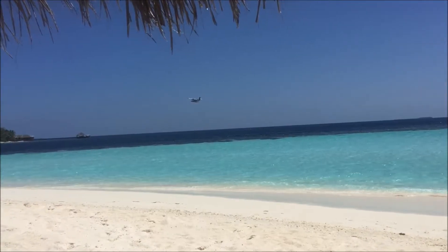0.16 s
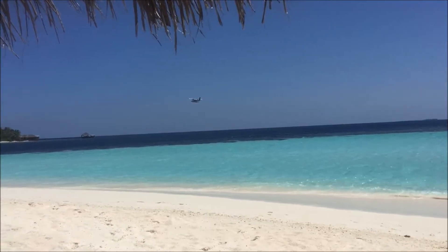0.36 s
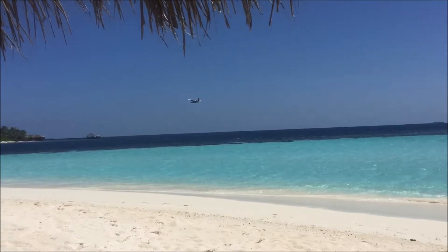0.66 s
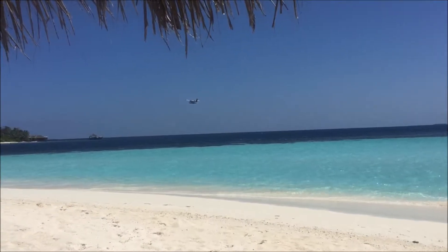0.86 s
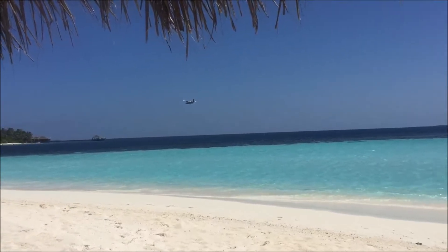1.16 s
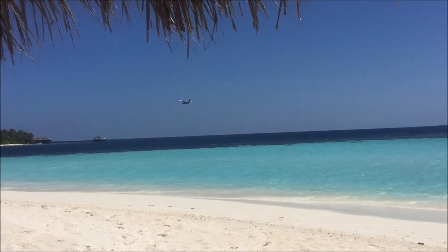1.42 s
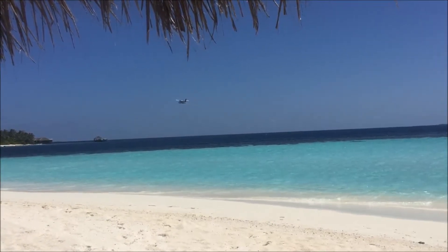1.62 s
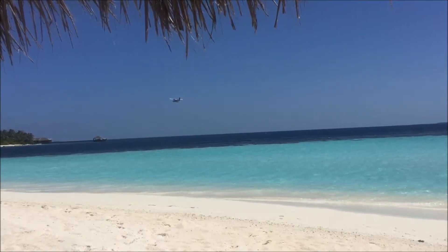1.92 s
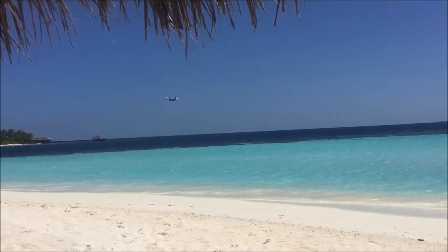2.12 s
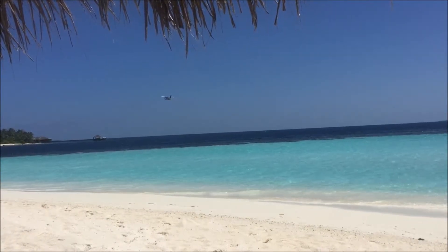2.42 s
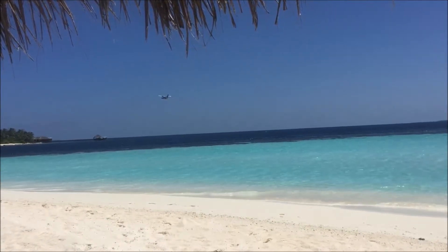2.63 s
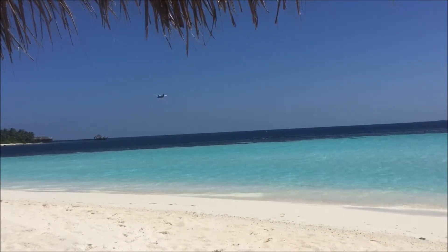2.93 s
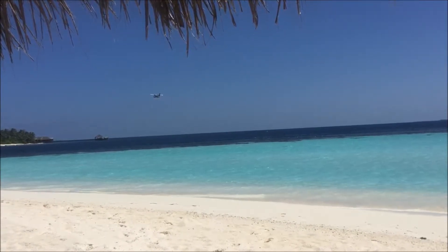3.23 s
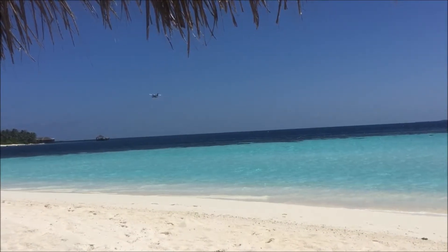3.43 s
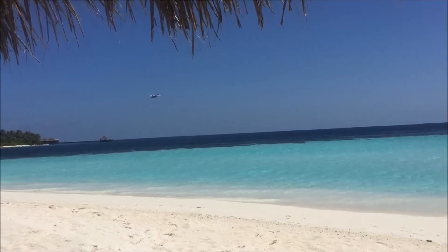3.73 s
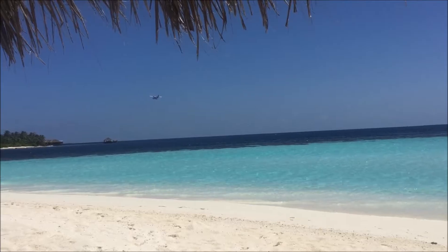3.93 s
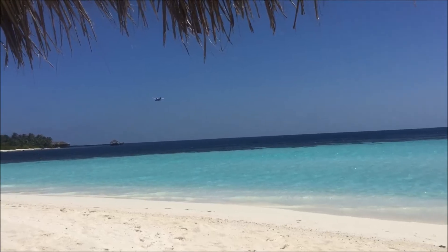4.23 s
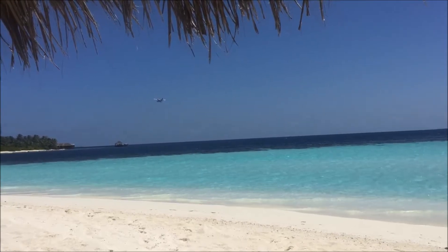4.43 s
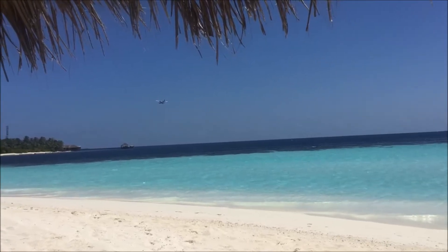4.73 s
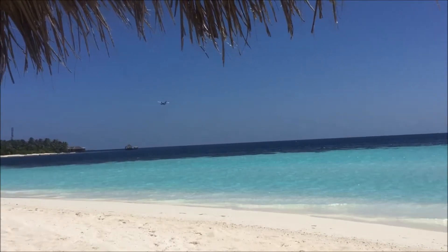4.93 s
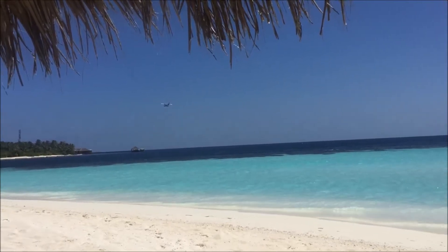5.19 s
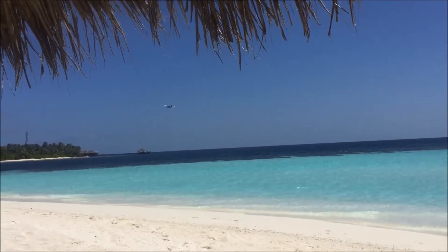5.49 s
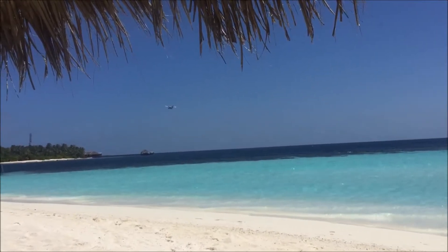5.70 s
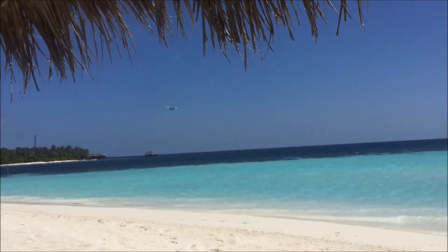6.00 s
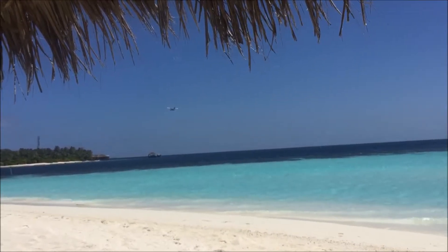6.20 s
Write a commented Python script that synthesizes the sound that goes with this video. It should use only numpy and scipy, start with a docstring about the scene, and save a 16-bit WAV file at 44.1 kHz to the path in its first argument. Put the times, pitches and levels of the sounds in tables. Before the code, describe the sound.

A departing twin-propeller seaplane hums in a low, slowly throbbing drone that fades over a beach with faint small waves and fizzing foam.

```python
"""A twin-turboprop seaplane flies away over a calm lagoon, heard from the beach.
Its two propellers are stacks of pure tones that beat slowly together over a noise roar.
Their drone also returns smeared from sea and shore, as tones that wander in level and phase.
A diesel and other hums sound far off, made of steady and wavering tones.
Small waves wash in and foam fizzes and pops: shaped noise mixed with many tiny ringing bubbles."""
import sys
import numpy as np
from scipy import signal
from scipy.fft import rfft, irfft, next_fast_len
from scipy.io import wavfile
from scipy.ndimage import uniform_filter1d

SR = 44100
rng = np.random.default_rng(int(sys.argv[2]) if len(sys.argv) > 2 else 0)


def pcm_store(signal):
    """Save signal as 16-bit PCM."""
    levels = np.round(np.clip(np.atleast_2d(signal), -1, 1) * 32767)
    wavfile.write(sys.argv[1], SR, levels.astype(np.int16).T)


N = 280035
TIME = np.arange(N) / SR  # seconds

# The plane's level as it draws away: time_s, level_db
FLIGHT = [(0, -27), (2, -28.5), (4, -30), (5, -33.5), (6.35, -39)]
# Blade rate of the faster propeller at the start, and its Doppler sag as the plane turns away
BLADE_HZ, SAG_HZ_PER_S = 96.9, 0.32
# Tones of each propeller, on top of the plane's level: multiple_of_blade_rate, level_db
FAST_PROP = [(1, 1), (2, -29)]
SLOW_PROP = [(1, -1.5), (2, -12), (3, -27.5), (4, -40)]
# Added level of the slower propeller, which sets how deep the beat is: time_s, level_db
SLOW_LEVEL = [(0, 1.5), (1.6, -1), (2.6, -0.5), (3.6, -4), (4.6, -3), (6.35, -3)]
# How far the slower propeller lags; the main tones oppose at every half blade: time_s, lag_blades
LAG = [(0, -.1), (.3, .15), (.72, .5), (.88, .8), (1.3, 1.15), (1.62, 1.5), (1.86, 1.7), (2.0, 1.93),
       (2.35, 2.28), (2.66, 2.5), (2.87, 2.8), (3.25, 3.05), (3.6, 3.5), (3.8, 3.67), (3.92, 3.92),
       (4.27, 4.1), (4.45, 4.45), (5.3, 5.15), (5.6, 5.5), (6.35, 6.3)]
# Broad roar of exhaust and wake: pitch_hz, relative_level_db_per_hz
ROAR = [(125, 3.5), (165, 7.5), (260, -0.5), (370, -3), (620, -11.5), (850, -20), (1300, -23), (2200, -28)]

# Scattered drone, before its level changes over time:
# multiple_of_blade_rate, level_db, doppler_ratio (pitch factor of the paths that carry it)
SCATTER = [(1, -38.5, 1.085), (2, -41, 1.055), (2, -53, 1.14), (3, -51.5, 1.075), (4, -57.5, 1.11),
           (5, -60, 1.11), (6, -62.5, 1.1)]
# Quick, irregular changes in level of the scattered drone:
# time_s, second_harmonic_db, third_harmonic_db
SCATTER_CHANGES = [(0, 1, -1), (.13, -1, 5), (.38, -8, -2.5), (1.12, 0, -2.5), (1.55, 2.5, 1), (2.1, -3, 1),
                   (2.45, -6, 0.5), (2.65, 2.5, 1.5), (3.07, 2.5, 5), (3.33, 3, 2), (3.6, -3, 1),
                   (3.9, 7, 1), (4.07, -5.5, -2), (4.28, 3, -.5), (4.55, -1.5, -1), (4.73, 6.5, -0.5),
                   (4.85, -2, -4), (5.1, 1.5, -6), (5.42, -5, 4.5), (5.7, 6.5, 2), (5.85, -1, -1.5),
                   (6.1, 0.5, 4.5), (6.35, 5, -3)]

# Tones of a distant diesel: multiple_of_shaft_rate, level_db
DIESEL = [(2, -70), (3, -60.5), (4, -41), (5, -49.5), (6, -52), (8, -50.5), (10, -56)]
# Wavering background hums: pitch_hz, width_hz, level_db
HUMS = [(63.77, 2.7, -50), (115.5, 4.9, -43.5), (159.4, 4, -55), (254.6, 10.7, -59)]

# Small waves that break on the shore:
# crest_s, rise_s, dull_rush_db, wash_db, spray_db, wash_fall_db_per_s
WAVES = [(.04, 0.75, -40, -42, -72, 11), (.37, 0.16, -48.5, -46, -78, 4), (.99, 0.58, -56, -47, -68.5, 8.5),
         (1.3, 0.6, -43.5, -53.5, -84, 4), (1.9, 0.63, -49, -49.5, -68, 12),
         (2.74, 0.42, -46.5, -48.5, -59.5, 8), (4.08, 0.63, -48.5, -48, -67, 3),
         (5.39, 0.49, -46.5, -47, -58, 20), (5.8, .25, -54, -59, -66, 24)]
RUSH_FALL_DB_PER_S, SPRAY_FALL_DB_PER_S = 17.5, 11.5
RUSH_REST_DB, WASH_REST_DB = -52.5, -50.5  # the water between waves
# Sheets of foam that run up the sand and soak in: fullest_s, rise_s, level_db, fall_db_per_s
FOAM = [(.05, 0.34, -57.5, 4.5), (1.02, 0.34, -51, 35), (1.68, 0.17, -60, 46), (2.68, 0.37, -59, 7),
        (4.2, 1.2, -60, 8.5), (5.42, 0.53, -65, 6.5)]
# Tone colours of the dull rush, the wash, the breaking spray and the foam:
# pitch_hz, relative_level_db_per_hz
RUSH = [(400, -11), (620, -2), (830, -2.5), (1100, 0.5), (1600, -2), (1950, -4), (2800, -23)]
WASH = [(900, -33), (1400, -7), (1800, -1.5), (2300, 1), (2800, 0.5), (3150, -7.5), (3900, -9.5),
        (4400, -19), (4850, -30), (5600, -30), (7500, -53)]
SPRAY = [(2800, -4.5), (4000, 7), (4800, -5.5), (5700, -3), (6500, -22), (8000, -28)]
FIZZ = [(3500, -31), (4900, -12.5), (5700, 1), (6800, 1), (7350, -4), (8000, -2), (8750, 3), (9700, 3.5),
        (10400, -7), (10900, -2), (11700, -2.5), (12900, -23), (15500, -29)]

# Single bubbles and drops, and one slap of a wave near 1 s: start_s, peak_db, pitch_hz, width_hz, ring_s (time
# to fall 60 dB)
POPS = [(0.078, -36, 1390, 120, .035), (0.102, -35, 1650, 120, 0.031), (0.131, -32, 1100, 110, .03),
        (.27, -42, 6400, 2000, .012), (.338, -46, 6850, 700, .025), (.536, -47, 11100, 1100, .02),
        (.751, -44, 6300, 900, .025), (0.864, -37, 9500, 1200, 0.01), (0.971, -45, 4270, 900, 0.044),
        (.984, -39, 7500, 2000, .012), (.997, -30, 950, 550, .018), (1.031, -41, 5940, 700, .015),
        (1.114, -39, 9500, 1500, 0.0079), (1.324, -48, 6500, 3000, .012), (1.377, -40, 8900, 1800, 0.022),
        (2.603, -47, 6460, 700, 0.04), (2.806, -41, 11600, 700, 0.02), (3.143, -49, 7600, 1200, 0.033),
        (3.401, -43, 6500, 700, 0.023), (3.526, -29.5, 2252, 110, 0.031), (3.831, -44, 8700, 2200, .015),
        (4.275, -46, 6900, 1200, 0.023), (4.38, -46, 10200, 1400, .008), (4.549, -40, 8900, 3000, 0.006),
        (4.552, -35.5, 7000, 4500, 0.004)]

# Tone colour of the open sea's low murmur: pitch_hz, relative_level_db_per_hz
AIR = [(30, -23), (42, -1), (55, 6), (130, 0), (180, 6.5), (240, 0.5), (350, -10), (480, -11.5), (650, -9),
       (850, -13.5), (2000, -40)]

HISS_DB = -74  # self-noise of the microphone, before the top is cut
TOP_HZ = 15700  # the treble is cut above this


def undb(db):
    """Turn decibels into a gain."""
    return 10 ** (np.asarray(db) / 20)


def unit(x):
    """Scale a sound to an average strength (rms) of 1."""
    return x / np.sqrt(np.mean(np.abs(x) ** 2))


def curves(table):
    """Join the points of each table column by straight lines in time."""
    s, *columns = np.transpose(table)
    return [np.interp(TIME, s, column) for column in columns]


def noise():
    """Plain white noise, equally strong at every pitch."""
    return rng.standard_normal(N)


def colour(x, spectrum):
    """Shape a sound by a table of pitches and levels, falling steeply beyond its ends; rms 1."""
    size = next_fast_len(N)
    hz, db = np.transpose(spectrum)
    f = np.maximum(np.arange(size // 2 + 1) * SR / size, 1)
    skirts = np.minimum(f / hz[0], 1) ** 2 * np.minimum(hz[-1] / f, 1) ** 2
    gain = skirts * undb(np.interp(np.log(f), np.log(hz), db))
    return unit(irfft(rfft(x, size) * gain, size)[:N])


def walk(rate):
    """Smooth random wandering with spread 1, about `rate` turns a second."""
    points_per_s = 500
    f = np.fft.rfftfreq(4096, 1 / points_per_s)
    rough = rng.standard_normal(2 * len(f) - 2)
    slow = irfft(rfft(rough) * np.exp(-(f / rate) ** 2))
    return unit(np.interp(TIME, np.arange(len(slow)) / points_per_s, slow))


def turns(hz):
    """Add up a changing rate into a running phase, in radians."""
    return 2 * np.pi * np.cumsum(hz) / SR


def tones(phase, orders, flutter_db, flutter_rate):
    """Harmonics of a rotor; turbulent air makes each flutter in level."""
    total = 0
    for multiple, db in orders:
        gain = undb(db + flutter_db * walk(flutter_rate))
        total = total + gain * np.sin(round(multiple) * phase)
    return np.sqrt(2) * total  # a sine then has the rms level given by its table


def propellers(phase, level_db):
    """The slower propeller slips one blade behind the other in every beat; exhaust roars beneath."""
    lag_blades, = curves(LAG)
    slow_db, = curves(SLOW_LEVEL)
    fast = tones(phase, FAST_PROP, flutter_db=0.4, flutter_rate=6)
    slow = tones(phase - 2 * np.pi * lag_blades, SLOW_PROP, flutter_db=0.4, flutter_rate=6)
    roar = undb(-18.5) * colour(noise(), ROAR)
    return undb(level_db) * (fast + undb(slow_db) * slow + roar)


def smeared(phase, width_hz, even_s=0.21):
    """A tone over many shifting paths: it flutters and wanders in phase about an even level."""
    paths = walk(width_hz) + 1j * walk(width_hz)
    recent_power = uniform_filter1d(np.abs(paths) ** 2, int(even_s * SR))
    paths = paths / np.sqrt(recent_power)
    return unit(np.real(paths * np.exp(1j * phase)))


def scattered_drone(phase, spread_hz=4.2, fade_db=0.28, waver_db=2.5):
    """Echoes left the plane earlier, at other angles, so sound higher; upper harmonics spread more."""
    recede_s = TIME - TIME.mean()
    second_db, third_db = curves(SCATTER_CHANGES)
    drawn_db = {1: 0, 2: second_db, 3: third_db}
    total = 0
    for k, db, ratio in SCATTER:
        order = round(k)
        # harmonics above the third waver at random
        change_db = drawn_db[order] if order in drawn_db else waver_db * walk(5.0)
        # the fundamental grows slightly; from the second up, each fades faster than the one below
        fade = fade_db * (k - 1.5) * recede_s
        tone = smeared(order * ratio * phase, k * spread_hz + 3, even_s=k * 0.12)
        total = total + undb(db + change_db - fade) * tone
    return total


def far_engines():
    """A diesel turns at nearly steady speed, with hums that waver around it."""
    shaft_hz = 15.315 * (1 + 0.0013 * walk(0.95))
    diesel = tones(turns(shaft_hz), DIESEL, flutter_db=0.3, flutter_rate=0.98)
    hums = sum(undb(db) * smeared(2 * np.pi * hz * TIME, width / 2) for hz, width, db in HUMS)
    return diesel + hums


def bubbles(per_second, scatter_db, low_hz, high_hz, cycles):
    """Bubbles of unequal size each ring for some cycles and rise a little in pitch."""
    count = int(per_second * N / SR)
    when, pitch, chance, life = rng.random((count, 4)).T[..., None]
    hz = low_hz * (high_hz / low_hz) ** pitch
    size = undb(-scatter_db * np.log(np.maximum(chance, 0.01)))  # a few are much louder
    samples = np.arange(SR // 100)
    done = hz * samples / SR  # cycles rung so far
    age = done / (cycles * (0.5 + life))
    fade = np.exp(-np.log(100) * age)  # 40 dB down at age 1
    rings = size * np.sin(2 * np.pi * done * (1 + 0.02 * age)) * fade
    places = (when * N).astype(int) + samples
    return unit(np.bincount(places.ravel(), rings.ravel(), N)[:N])


def water(spectrum, grains, share):
    """Smooth hiss of countless far bubbles with a share of near, distinct ones."""
    far = np.sqrt(1 - share) * colour(noise(), spectrum)
    near = np.sqrt(share) * colour(grains, spectrum)
    return far + near


def patchy(x, depth_db, bins=7, frames=16):
    """Patches of water splash on their own, so neighbouring pitches swell and sink together."""
    cells = signal.stft(x, nperseg=512)[2]  # grid of pitch against time
    field = rng.standard_normal(cells.shape)
    field = uniform_filter1d(field, int(bins), axis=0)
    field = uniform_filter1d(field, int(frames), axis=1)
    return unit(signal.istft(cells * undb(depth_db * unit(field)))[1][:N])


def swell(crest_s, rise_s, db, fall_db_per_s):
    """Power of one surge: over rise_s a rounded 20 dB climb to its crest, then a steady fall in dB."""
    age = TIME - crest_s
    drop_db = np.where(age < 0, 20 * (age / rise_s) ** 2, fall_db_per_s * age)
    return undb(db - drop_db) ** 2


def surges(rest_db, rows):
    """Gain of a resting level with overlapping surges on top."""
    return np.sqrt(undb(rest_db) ** 2 + sum(swell(*row) for row in rows))


def surf():
    """Waves break with a dull rush and some spray and wash on; foam bursts on the sand."""
    rush_rows = [(s, rise, db, RUSH_FALL_DB_PER_S) for s, rise, db, _, _, _ in WAVES]
    wash_rows = [(s, rise, db, fall) for s, rise, _, db, _, fall in WAVES]
    spray_rows = [(s, rise, db, SPRAY_FALL_DB_PER_S) for s, rise, _, _, db, _ in WAVES]
    rush_gain = surges(RUSH_REST_DB, rush_rows)
    wash_gain = surges(WASH_REST_DB, wash_rows)
    # spray and foam have no resting level
    spray_gain = np.sqrt(sum(swell(*row) for row in spray_rows))
    fizz_gain = np.sqrt(sum(swell(*sheet) for sheet in FOAM))

    splash = bubbles(per_second=1500, scatter_db=2.5, low_hz=1700, high_hz=6500, cycles=28)
    foam = bubbles(per_second=1500, scatter_db=3.6, low_hz=4800, high_hz=12500, cycles=55)
    gurgle = bubbles(per_second=450, scatter_db=2.5, low_hz=950, high_hz=3000, cycles=36)

    wash = patchy(water(WASH, splash, share=0.25), depth_db=1)
    spray = patchy(water(SPRAY, splash, share=0.6), depth_db=2)
    fizz = patchy(water(FIZZ, foam, share=0.42), depth_db=1.7)
    rush = patchy(water(RUSH, gurgle, share=0.2), depth_db=1.5)

    # all but the spray also flicker quickly in level
    rush = rush * rush_gain * undb(0.15 * walk(22))
    wash = wash * wash_gain * undb(0.86 * walk(42))
    fizz = fizz * fizz_gain * undb(0.84 * walk(26))
    return rush + wash + fizz + spray * spray_gain


def pops(rise_share=0.13):
    """Larger bubbles and drops burst, and a wave slaps once, each with a short, rough ring; the purer it is,
    the softer its start."""
    out = np.zeros(N)
    t = TIME[:SR // 10]
    f = np.fft.rfftfreq(len(t), 1 / SR)
    for start_s, db, hz, width, ring_s in POPS:
        band = np.exp(-((f - hz) / width) ** 2)
        ring = irfft(rfft(rng.standard_normal(len(t))) * band, len(t))
        rise = 1 - np.exp(-t * width / rise_share)
        fall = np.exp(-np.log(1000) * t / ring_s)
        ring = ring * rise * fall
        start = int(start_s * SR)
        out[start:start + len(t)] += undb(db) * ring / np.abs(ring).max()
    return out


def open_sea():
    """The low murmur of the open sea: shaped noise that wavers gently in level."""
    return colour(noise(), AIR) * undb(-44.5 + 1.5 * walk(9.3))


def scene():
    """Plane, distant engines and shore over the low murmur of the open sea."""
    level_db, = curves(FLIGHT)
    phase = turns(BLADE_HZ - SAG_HZ_PER_S * TIME)
    plane = propellers(phase, level_db) + scattered_drone(phase)
    shore = surf() + pops()
    return (plane + far_engines() + shore + open_sea())[None]


def record(dry):
    """The microphone adds a faint, even hiss, and a steep filter cuts the top."""
    hiss = undb(HISS_DB) * noise()
    top_cut = signal.ellip(8, 0.2, 70, TOP_HZ, fs=SR, output="sos")
    return signal.sosfilt(top_cut, dry + hiss)


dry = scene()
out = record(dry)
pcm_store(out)
```